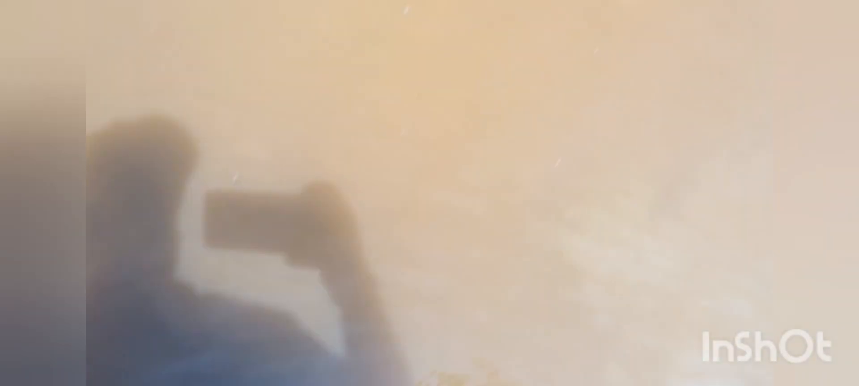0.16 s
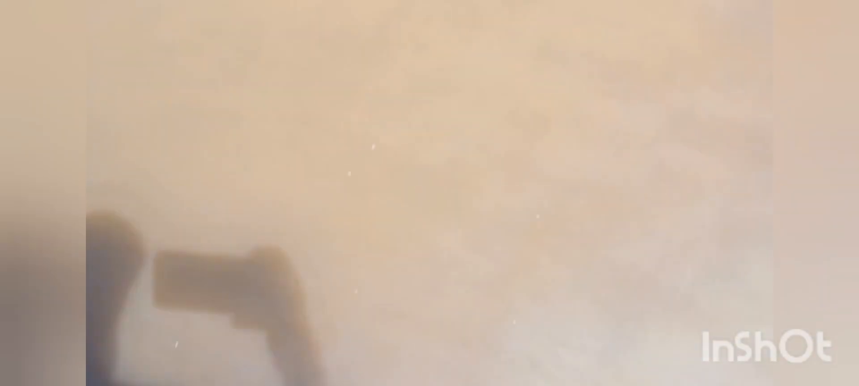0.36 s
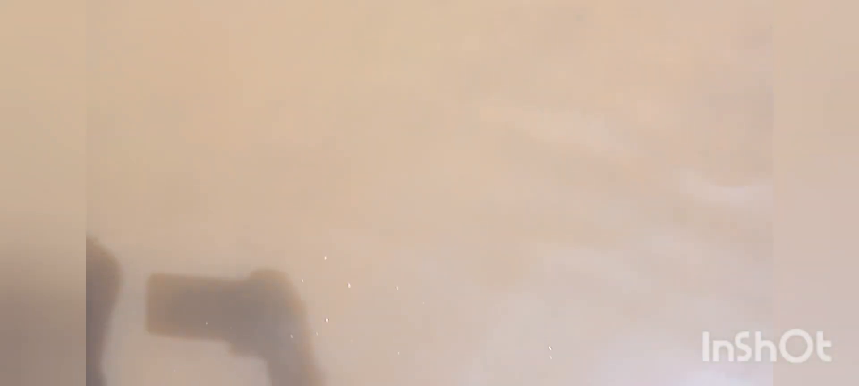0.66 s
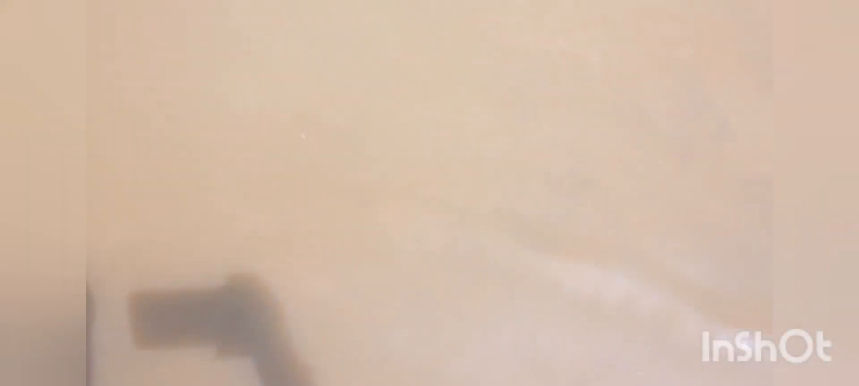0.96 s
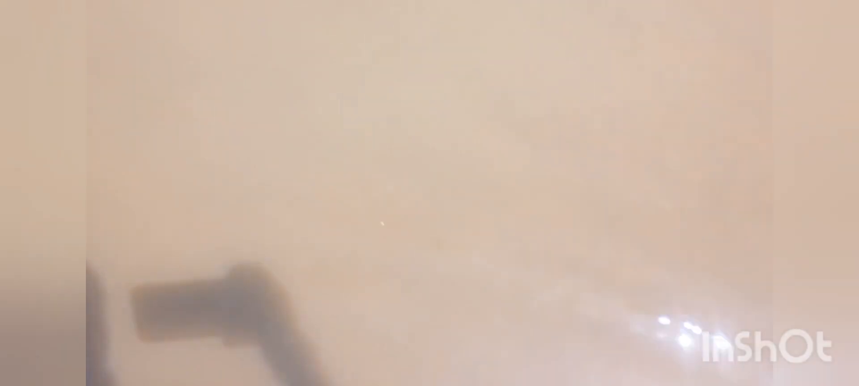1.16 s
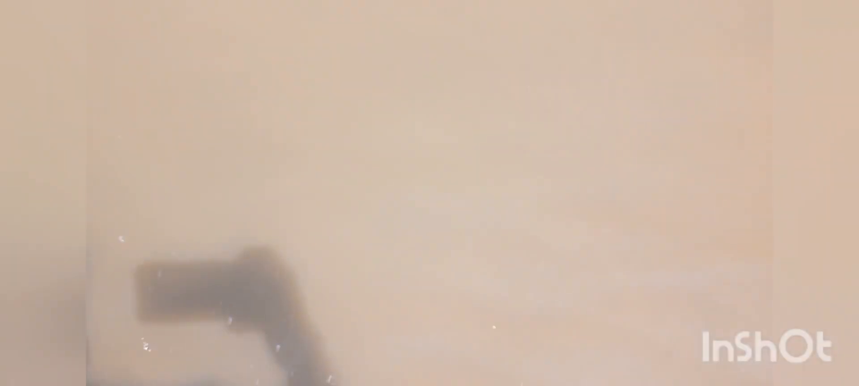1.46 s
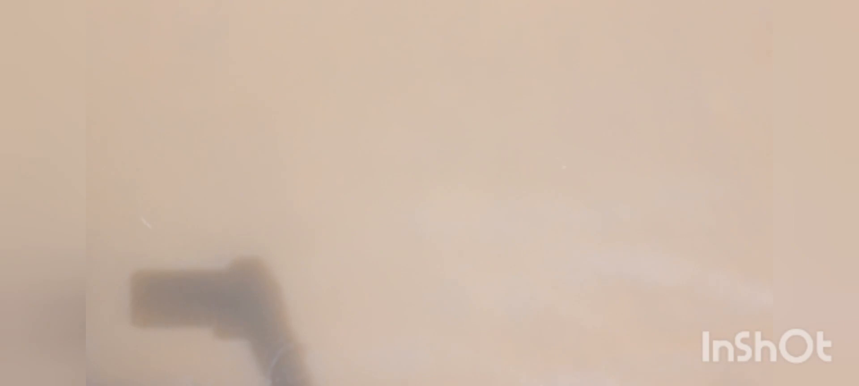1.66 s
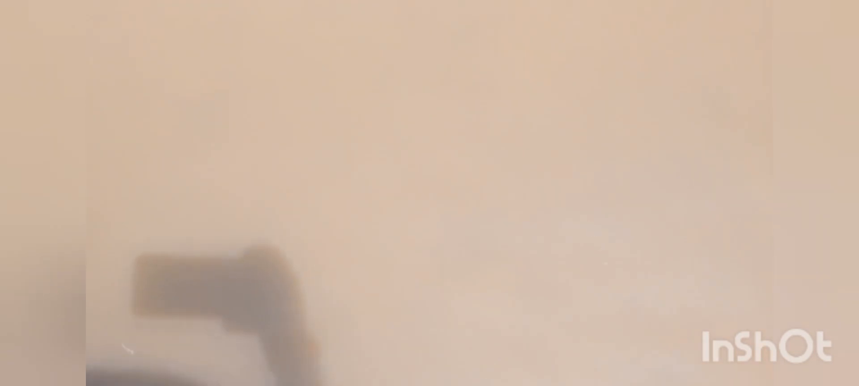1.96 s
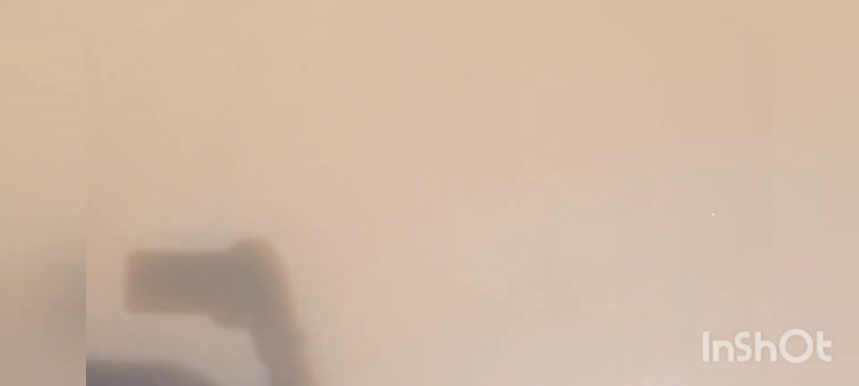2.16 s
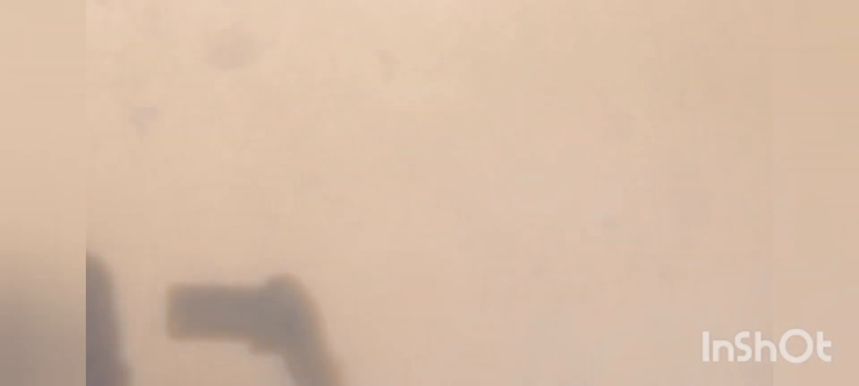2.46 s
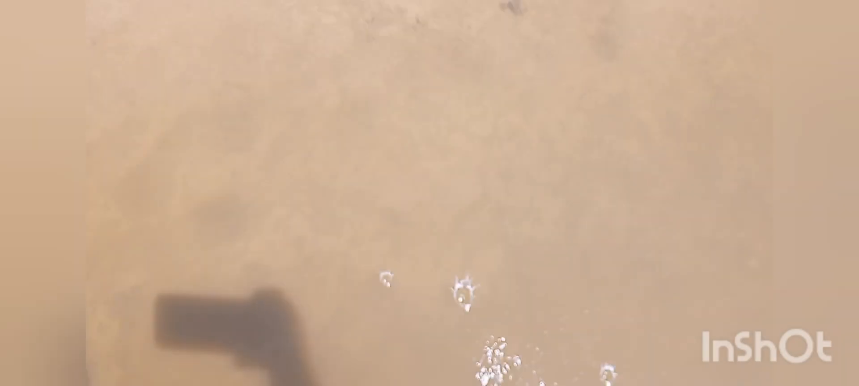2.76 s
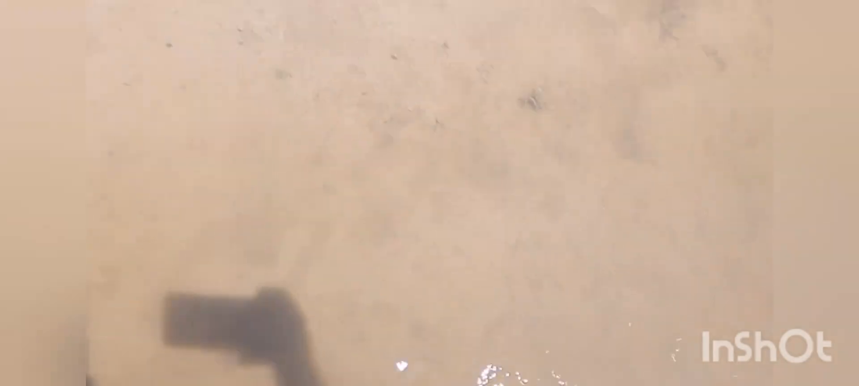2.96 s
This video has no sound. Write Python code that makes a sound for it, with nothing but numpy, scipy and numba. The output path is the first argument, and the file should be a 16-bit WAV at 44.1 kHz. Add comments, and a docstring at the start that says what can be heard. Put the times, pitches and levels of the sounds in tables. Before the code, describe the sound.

Shallow water sloshes, gurgles and splashes close by as someone wades dragging a net.

```python
"""Wading with a net

Someone wades through shallow water dragging a net, close to a phone outdoors. Spray and gurgles are
swarms of tiny ringing bubbles mixed with hiss; the water pushed aside is a low slosh of the same make.
Single drops, ticks, plops and slaps stand out as bubbles of their own. The bright ones scatter off
the surroundings, over a faint bed of air noise."""
import sys
import numpy as np
from scipy import signal
from scipy.fft import rfft, irfft, next_fast_len
from scipy.io import wavfile
from scipy.ndimage import uniform_filter1d, map_coordinates
from numba import njit

SR = 44100
rng = np.random.default_rng(int(sys.argv[2]) if len(sys.argv) > 2 else 0)


def unload_audio(sound):
    """Save the sound as a 16-bit wav file, at the path given as the first command line argument."""
    columns = np.transpose(np.atleast_2d(sound))
    # keep every value between -1 and 1, then stretch to whole-number steps
    steps = np.round(np.clip(columns, -1, 1) * 32767)
    wavfile.write(sys.argv[1], SR, steps.astype(np.int16))


def boost_factor(decibels):
    """Convert a level in decibels to a linear amplitude factor."""
    exponent = np.asarray(decibels, float) / 20
    return 10 ** exponent


N = 136710  # length [samples]

RISE = 0.088  # bubble pitch ends higher by twice this share
ATTACK = 0.078  # time constant of a bubble's soft start [share of its life]


def unit(x):
    """Scale to rms 1."""
    return x / np.sqrt(np.mean(x ** 2) + 1e-20)


def along(points, hz):
    """Read (frequency [Hz], value) points on a log frequency axis."""
    f, v = np.transpose(points)
    return np.interp(np.log(hz + 1), np.log(f + 1), v)


def curves(rows):
    """One value per sample for each column after the time."""
    s, *cols = np.transpose(rows)
    time = np.arange(N) / SR
    return [np.interp(time, s, c) for c in cols]


def wobble(rate):
    """A smooth random curve with rate knots a second, up to 200."""
    knots = rng.standard_normal(int(N / SR * 200) + 4)
    return map_coordinates(knots, [np.arange(N) * rate / SR])


def hiss(spectrum):
    """Coloured noise of rms 1."""
    m = next_fast_len(N + 8192)
    gain = boost_factor(along(spectrum, np.fft.rfftfreq(m, 1 / SR)))
    return unit(irfft(rfft(rng.standard_normal(N), m) * gain, m)[:N])


def patched(x, patchy_db):
    """Random patches of more and less gain, some 500 Hz by 40 ms; rms 1."""
    z = signal.stft(x, nperseg=256)[2]
    field = uniform_filter1d(rng.standard_normal(z.shape), size=3, axis=0)
    field = uniform_filter1d(field, size=14, axis=1)
    return unit(signal.istft(z * boost_factor(patchy_db * unit(field)), nperseg=256)[1][:N])


@njit
def ring(s, size, hz, cycles, rise, attack, n, sr):
    """Sum of bubbles: sines that start softly, climb in pitch and fall 60 dB over their life."""
    out = np.zeros(n)
    for k in range(len(s)):
        life, start = cycles[k] / hz[k] * sr, int(s[k] * sr)
        for i in range(min(int(life), n - start)):
            u = i / life
            envelope = np.exp(-6.9 * u) * (1 - np.exp(-u / attack)) ** 2
            phase = 2 * np.pi * cycles[k] * u * (1 + rise * u)
            out[start + i] += size[k] * envelope * np.sin(phase)
    return out


def swarm(spectrum, count, cycles, spread_db, noise, patchy_db):
    """Random bubbles over a spectrum, a few much larger, mixed with a share of hiss; rms 1."""
    when, pitch, luck, kind = rng.random((count, 4)).T
    # the outermost points shape only the hiss
    lo, hi = spectrum[1][0], spectrum[-2][0]
    hz = lo * (hi / lo) ** pitch
    extra_db = spread_db * np.minimum(-np.log(1 - luck), 4.5)
    # times hz: high bubbles are shorter and spread over more Hz
    size = hz * boost_factor(along(spectrum, hz) + extra_db)
    # kind sets both the polarity and the life
    size = size * np.sign(kind - 0.5)
    life_cycles = cycles * (0.77 + 0.74 * kind)
    bubbles = unit(ring(when * N / SR, size, hz, life_cycles, RISE, ATTACK, N, SR))
    return patched(np.sqrt(1 - noise) * bubbles + np.sqrt(noise) * hiss(spectrum), patchy_db)


def singles(rows):
    """Bubbles placed one by one, each scaled by its envelope crest."""
    s, db, hz, cycles = np.transpose(rows)
    u = np.linspace(0, 1, 500)
    crest = np.max(boost_factor(-60 * u) * (1 - np.exp(-u / ATTACK)) ** 2)
    # twice the cycles of a 30 dB fall make the whole 60 dB life
    return ring(s, boost_factor(db) / crest, hz, np.maximum(cycles, 1) * 2, RISE, ATTACK, N, SR)


# Spray strength: (time [s], coarse level before trim [dB], then over the coarse spray:
# medium [dB], fine [dB], finest droplets [dB], mist [dB])
SPRAY_LEVELS = [(0.0, -55.5, -1, -13, -19, -25), (0.02, -54.5, -3, 1, -24, -34),
                (0.05, -72.5, 3, 4, -13, -12), (0.08, -59, -25, -10, -20, -31), (0.1, -74, -1, -3, -13, -9),
                (0.45, -49, -5, -15, -16, -29), (0.53, -58, -6, -9, -26, -27),
                (0.71, -45.5, -19, -8.5, -34, -32), (0.74, -43.5, -12, -1, -29, -29),
                (0.79, -46, -27, -11.5, -22, -40), (0.81, -40, -11, -3.5, -23, -42),
                (0.88, -60, -7, -5, -19, -24), (0.97, -42, -23, -26, -36, -46),
                (1.03, -59.5, -5, -19, -26, -23), (1.05, -48, -22, -13, -34, -48),
                (1.1, -63, -12, -7, -24, -30), (1.11, -47, -25, -22, -29, -40),
                (1.15, -39, -7, -13, -27, -39), (1.2, -41, -6, -16, -18, -38),
                (1.23, -31, -14, -19, -30, -44), (1.23, -38, -5.5, -15, -7, -34),
                (1.34, -37, -10, -13, -22.5, -35), (1.35, -31.5, -6, -6, -11, -36),
                (1.36, -44.5, -9, -10, -14, -32), (1.39, -39, -4, -7, -18, -33),
                (1.43, -43.5, -6, -6, -13, -39), (1.44, -37.5, -22, -13, -24, -51),
                (1.46, -43, -8, -6, -11, -36), (1.54, -41, -8, -17, -55, -41),
                (1.66, -58, -9, -10, -12, -30), (1.73, -51, 4, -19, -26, -37),
                (1.75, -57, 5, -14, -20, -23), (1.76, -38, -8, -11, -54, -35),
                (1.95, -36, -1, -6.5, -15, -34), (2.02, -32, -11, -2.5, -51, -49),
                (2.13, -42, -21, -1.5, -21, -38), (2.19, -51, -17, -15, -24, -37),
                (2.22, -40, -9, -16, -22, -40), (2.3, -67, -1, -9, -15, -29),
                (2.37, -53.5, -19, -13, -32, -40), (2.4, -41, -19, -11, -27, -36),
                (2.41, -43, -14, -14.5, -39, -48), (2.49, -42.5, -4.5, -7.5, -21, -34),
                (2.51, -37, -8.5, -9.5, -23, -47), (2.68, -38.5, -5.5, -7.5, -17.5, -38),
                (2.71, -35, -10.5, -15, -18.5, -40), (2.85, -37.5, -5.5, -4.5, -21.5, -34),
                (2.94, -46, -11, -9, -27, -40), (3.06, -44, -6, -15, -25, -35),
                (3.1, -47, -18, -10, -33, -38)]
# Colour of coarse, medium, fine and finest droplets: (frequency [Hz], relative level per Hz [dB])
COARSE_COLOUR = [(1290, 2), (2200, 0), (3200, 2), (4600, -8), (5980, -53), (10100, -120)]
MEDIUM_COLOUR = [(2530, -30), (4300, -4), (4570, 2.5), (5030, 1), (5800, -0.5), (7540, -31), (12800, -120)]
FINE_COLOUR = [(3290, -33), (5600, -4), (6280, 5), (6540, 0.5), (8200, -25), (10700, -52), (18000, -120)]
FINEST_COLOUR = [(4650, -33), (7900, 12), (10300, 1.5), (11800, -40.5), (15300, -69), (22000, -120)]
# Colour of the mist's hiss: (frequency [Hz], relative level per Hz [dB])
MIST_COLOUR = [(6820, -43), (11600, -2), (12200, -3), (15100, 5), (15800, -13)]


def spray(clumps):
    """Fizz and droplets in four sizes, a fine mist and bursting snaps, coming in shared clumps."""
    level_db, medium_db, fine_db, finest_db, mist_db = curves(SPRAY_LEVELS)
    coarse = swarm(COARSE_COLOUR, count=4000, cycles=15.5, spread_db=1.0, noise=0.36, patchy_db=1.04)
    medium = swarm(MEDIUM_COLOUR, count=3000, cycles=31, spread_db=4.0, noise=0.29, patchy_db=1.0)
    fine = swarm(FINE_COLOUR, count=4000, cycles=19.5, spread_db=2.0, noise=0.3, patchy_db=3.0)
    finest_gain = boost_factor(finest_db + 1.4 * wobble(60))
    finest = swarm(FINEST_COLOUR, count=8000, cycles=22, spread_db=3.4, noise=0.54, patchy_db=4.0)
    mist_gain = boost_factor(mist_db + 1.4 * wobble(70))
    mist = patched(hiss(MIST_COLOUR), patchy_db=3.0)
    # snaps of bursting droplets: shorter, fewer, no hiss
    snaps = swarm(FINE_COLOUR, count=1600, cycles=8.1, spread_db=4.0, noise=0, patchy_db=3.5)
    mix = coarse + boost_factor(medium_db) * medium + boost_factor(fine_db) * fine
    mix += finest_gain * finest + mist_gain * mist + boost_factor(fine_db - 11) * snaps
    return boost_factor(level_db - 2.0 + 2.34 * clumps) * mix


# Gurgle strength: (time [s], large-bubble level before trim [dB], small bubbles over it [dB])
GURGLE_LEVELS = [(0.0, -57, 4), (0.09, -52.5, -15), (0.13, -77.5, 10), (0.3, -41.5, -13),
                 (0.33, -45.5, -4.5), (0.37, -36.5, -11), (0.52, -55.5, 4), (0.56, -38, -8.5),
                 (0.65, -38, -7), (0.66, -49.5, -9), (0.72, -31.5, -12), (0.85, -68, -10),
                 (0.93, -47.5, 7.5), (1.03, -31.5, -8.5), (1.04, -42.5, -12), (1.1, -35.5, -13),
                 (1.23, -42.5, 6), (1.28, -35, -2.5), (1.31, -41, -5.5), (1.34, -37, 2.5),
                 (1.36, -48.5, 10), (1.48, -37.5, -6), (1.51, -52, 5), (1.54, -38, -1), (1.58, -41, -6.5),
                 (1.61, -43.5, -12), (1.63, -50, 3), (1.8, -34.5, -6), (1.82, -42.5, 6),
                 (1.91, -30.5, -7.5), (1.94, -38, 7), (1.96, -29.5, -10), (1.99, -35.5, -3),
                 (2.05, -31.5, -1.5), (2.21, -66.5, 14), (2.23, -55, 18), (2.28, -30.5, -19.5),
                 (2.3, -49.5, -3.5), (2.36, -46, -4), (2.43, -51.5, 7.5), (2.59, -37, 2.5),
                 (2.64, -43.5, 5), (2.69, -35.5, -2.5), (2.71, -27.5, -6), (2.75, -42, 5), (2.79, -31, -11),
                 (2.82, -46, 3), (2.85, -33, -9), (2.97, -50, 6.5), (3.1, -46, 3)]
# Colour of the large and the small bubbles: (frequency [Hz], relative level per Hz [dB])
LARGE_COLOUR = [(180, -19), (310, -1.5), (639, 1.5), (739, -1.5), (832, -8.5), (920, -9), (1200, -47.5),
                (2020, -120)]
SMALL_COLOUR = [(520, -25), (880, -1.5), (1260, -2.5), (1470, -9), (1660, -6.5), (1800, -7.5), (2030, -2),
                (2350, -10.5), (3060, -7), (5170, -120)]


def gurgle(clumps):
    """Trapped air ringing as large and smaller bubbles, churned under by legs and net."""
    level_db, small_db = curves(GURGLE_LEVELS)
    large = swarm(LARGE_COLOUR, count=1300, cycles=13.9, spread_db=2.5, noise=0.33, patchy_db=1.2)
    small = swarm(SMALL_COLOUR, count=2200, cycles=17.5, spread_db=0.0, noise=0.15, patchy_db=3.77)
    mix = boost_factor(1.07 * clumps) * large + boost_factor(small_db + 1.38 * clumps) * small
    return boost_factor(level_db - 1.5) * mix


# Slosh strength: (time [s], heave level before trim [dB], churn over it [dB])
SLOSH_LEVELS = [(0.0, -40, -12), (0.02, -29, -33), (0.12, -53, -12), (0.21, -38.5, -34), (0.23, -53, -1.5),
                (0.44, -32, -38), (0.47, -43.5, -16), (0.53, -37.5, -25), (0.55, -27, -13),
                (0.58, -19.5, -3), (0.63, -29, 0.5), (0.76, -29, -9.5), (0.82, -43, -1), (0.87, -38.5, -21),
                (0.95, -57.5, -10), (1.11, -21.5, -8), (1.23, -32.5, -5), (1.36, -65, -13),
                (1.45, -52, -12), (1.51, -31.5, -19), (1.54, -29, -5), (1.68, -36, -10), (2.01, -46.5, 4.5),
                (2.04, -29.5, -9.5), (2.11, -48.5, -3), (2.22, -44, -13), (2.28, -27, -10.5),
                (2.36, -34, 0.5), (2.39, -33.5, -5.5), (2.43, -35, -15), (2.48, -30.5, -2.5),
                (2.53, -23, -24), (2.59, -30.5, -2.5), (2.72, -24.5, -7.5), (2.75, -31.5, -8),
                (3.1, -49, -7.5)]
# Colour of the heave and the churn: (frequency [Hz], relative level per Hz [dB])
HEAVE_COLOUR = [(18, -55.5), (30, -11.5), (80, 5.5), (140, -11.5), (180, -52), (310, -120)]
CHURN_TONE = [(76, -28), (130, 4.5), (172, -1), (247, -4), (330, -6.5), (430, -44), (730, -120)]


def slosh():
    """The low heave of displaced water and its faster churn, each swaying at its own rate."""
    level_db, churn_db = curves(SLOSH_LEVELS)
    heave_gain = boost_factor(0.9 * wobble(14))
    heave = swarm(HEAVE_COLOUR, count=250, cycles=19, spread_db=5.0, noise=0.61, patchy_db=2.0)
    churn_gain = boost_factor(churn_db + 1.66 * wobble(23))
    churn = swarm(CHURN_TONE, count=350, cycles=11.7, spread_db=5.0, noise=0.39, patchy_db=-1.5)
    return boost_factor(level_db - 0.56) * (heave_gain * heave + churn_gain * churn)


# Big bubbles closing, then slaps of the water's mass, both as
# (time [s], peak level [dB], pitch [Hz], cycles to fall 30 dB [count, under 1 plays as 1])
PLOP_HITS = [(0.005, -35, 513, 7.5), (0.065, -41, 520, 10.5), (0.27, -39.5, 315, 4.5),
             (0.284, -39.5, 464, 13), (0.342, -34.5, 636, 4.5), (0.364, -38, 658, 13),
             (0.376, -30, 373, 5.5), (0.601, -23, 490, 7.5), (0.621, -25.5, 670, 6),
             (0.634, -24.5, 477, 3.5), (0.709, -27.5, 554, 10), (0.734, -26.5, 591, 5.5),
             (0.77, -36.5, 597, 7), (0.913, -33.5, 694, 14), (0.948, -34, 770, 6), (0.975, -25, 805, 3),
             (0.99, -26.5, 348, 4), (1.062, -31.5, 534, 4), (1.096, -23.5, 420, 4.5),
             (1.275, -23.5, 558, 6), (1.334, -21, 680, 3.5), (1.384, -31.5, 1030, 12),
             (1.418, -25, 690, 2.5), (1.529, -26, 545, 2.5), (1.594, -29, 394, 8.5), (1.794, -35, 654, 23),
             (2.047, -22.5, 392, 5), (2.077, -33.5, 453, 7), (2.228, -26, 960, 4.5), (2.258, -29, 484, 2),
             (2.542, -24.5, 363, 5.5), (2.58, -27.5, 434, 9.5), (2.707, -14, 637, 4.5),
             (2.775, -20, 356, -2), (2.845, -30, 570, 4), (2.973, -35, 320, 8)]
SLAP_HITS = [(0.015, -27, 91.5, 1.5), (0.557, -10, 172, 2.5), (0.567, -19, 162, 5), (0.58, -7.5, 124, 2),
             (1.09, -26, 119, 3.5), (1.529, -18.5, 123, 2), (1.551, -26, 128, -4), (2.078, -21, 212, 1.5),
             (2.265, -16.5, 120, 3.5), (2.274, -31, 93, 2.5), (2.34, -20, 148, 4), (2.356, -18.5, 149, 4),
             (2.393, -21, 125, 1), (2.785, -19, 278, 2.5)]


def plops_and_slaps():
    """Low single hits: closing bubbles and slapping water, rung as short rising sines."""
    return singles(np.vstack([PLOP_HITS, SLAP_HITS]))


# Single small bubbles and drops, then bright ticks of spray landing, both as
# (time [s], peak level [dB], pitch [Hz], cycles to fall 30 dB [count, under 1 plays as 1])
DROP_HITS = [(0.0198, -35.5, 1324, 6.5), (0.0664, -49, 3160, 8), (0.184, -48, 1730, 12),
             (0.2004, -39.5, 1740, 10), (0.2209, -38.5, 1880, 5), (0.3407, -40.5, 1800, 9),
             (0.407, -38, 2870, 8), (0.435, -39, 2580, 14), (0.45, -41, 3000, 27),
             (0.7143, -24.5, 3340, 2.5), (0.7352, -36.5, 1910, 34), (0.7936, -32, 3650, 9),
             (0.81, -25.5, 3440, 9), (0.857, -33, 1913, 32), (0.9114, -34, 1600, 14),
             (0.9282, -33, 1600, 10), (0.947, -35, 2770, 24), (0.9692, -27, 1580, 7.5),
             (1.052, -36.5, 3200, 23), (1.2196, -26.5, 2640, 19), (1.2905, -27, 2110, 16),
             (1.3094, -29, 3050, 18), (1.3478, -23.5, 3100, 11), (1.422, -29.5, 2040, 15),
             (1.4388, -22, 3260, 22), (1.5154, -50, 2250, 14), (1.7672, -29.5, 3680, 18),
             (1.8083, -24, 2000, 12), (2.0312, -21, 2540, 9), (2.2129, -27.5, 3300, 14),
             (2.375, -36.5, 3100, 22), (2.4057, -28, 3480, 17), (2.5193, -21, 2820, 4.5),
             (2.8147, -25, 2790, 9), (2.892, -32.5, 2680, 16), (2.9287, -32, 1920, 18),
             (2.9575, -23.5, 3480, 4.5), (3.037, -31.5, 1890, 26)]
TICK_HITS = [(0.0184, -36, 5260, 8), (0.2894, -33.5, 5700, 1.5), (0.2934, -33, 4800, 0.5),
             (0.408, -34, 4700, 11), (0.4354, -35, 4980, 8), (0.7402, -42, 6460, 4),
             (0.8093, -31.5, 6650, 13), (0.858, -30.5, 5770, 8), (0.8794, -46, 6610, 8),
             (1.2212, -33, 6140, 12), (1.2345, -23, 5130, 12), (1.25, -27, 5650, 7.5),
             (1.2555, -32, 5030, 16), (1.3521, -14.5, 6430, 5), (1.3932, -23, 6500, 8),
             (1.456, -30.5, 6060, 8), (1.517, -26.5, 4800, 4), (1.5546, -29, 4880, 13),
             (1.6214, -44, 5530, 12), (1.662, -43, 4920, 8), (1.6891, -45, 5100, 17),
             (1.717, -31.5, 4640, 18), (1.7669, -35, 6100, 15), (2.0315, -21, 4840, 20),
             (2.2204, -32.5, 4360, 5), (2.629, -25, 5100, 8)]


def drops_and_ticks():
    """High single hits: small bubbles and landing spray, rung as short rising sines."""
    return singles(np.vstack([DROP_HITS, TICK_HITS]))


# Scatter off the water and bank: (frequency [Hz], time to fall 60 dB [s])
BANK_DECAY = [(300, 0.073), (3000, 0.078), (10000, 0.054)]


def bank(x):
    """A short diffuse answer from the surroundings: noise that dies away at its own pace by pitch."""
    hz, t, z = signal.stft(rng.standard_normal(SR // 4), SR, nperseg=128)
    decay = boost_factor(-60 * t / along(BANK_DECAY, hz)[:, None])
    tail = signal.istft(z * decay, SR, nperseg=128)[1]
    return signal.fftconvolve(x, tail / np.linalg.norm(tail))[:N]


# Colour of the background air: (frequency [Hz], relative level per Hz [dB])
AIR_COLOUR = [(18, -37), (30, -8), (93, 12), (198, -31), (581, -8), (1420, -45), (3030, -32), (6150, -24),
              (15800, -57)]


def air():
    """Faint background: coloured noise in slightly uneven patches."""
    return boost_factor(-82.5) * patched(hiss(AIR_COLOUR), patchy_db=3.5)


def scene():
    """Everything heard at the microphone; spray and gurgle share clumps, bright hits scatter."""
    clumps = 0.43 * wobble(14) + 0.93 * wobble(50.02)
    water = spray(clumps) + gurgle(clumps) + slosh() + plops_and_slaps()
    bright = drops_and_ticks()
    scatter = boost_factor(-8.5) * bank(bright)
    return (water + bright + scatter + air())[None]


def roll_off(x):
    """The treble ends steeply here."""
    return signal.sosfilt(signal.butter(12, 16520, fs=SR, output="sos"), x)


def record(dry):
    """The phone's two-pole low cut and steep band limit."""
    low_cut_hz, top_hz = 69.4, 15850
    m = next_fast_len(N + 8192)
    hz = np.fft.rfftfreq(m, 1 / SR)
    low_cut = (1j * hz / (low_cut_hz + 1j * hz)) ** 2
    mix = irfft(rfft(dry, m) * low_cut * (hz < top_hz), m)[:, :N]
    return roll_off(mix)


dry = scene()
out = record(dry)
unload_audio(out)
```